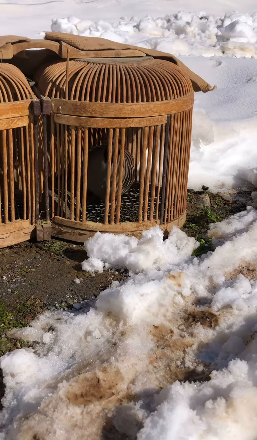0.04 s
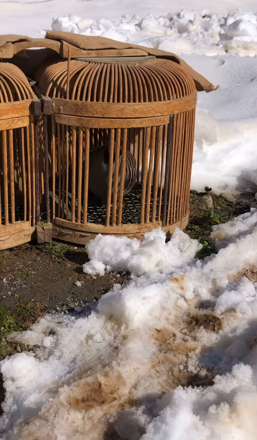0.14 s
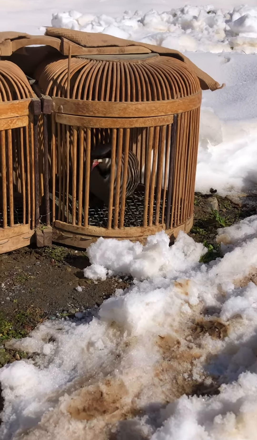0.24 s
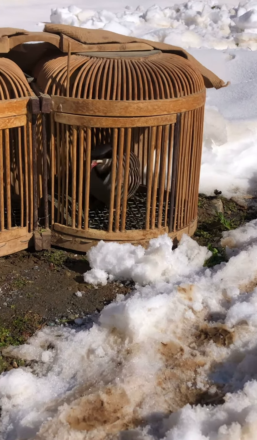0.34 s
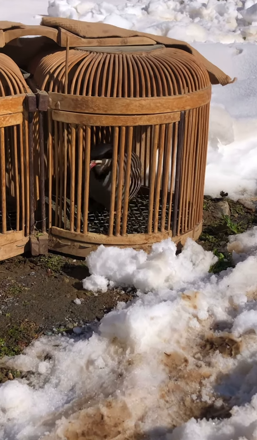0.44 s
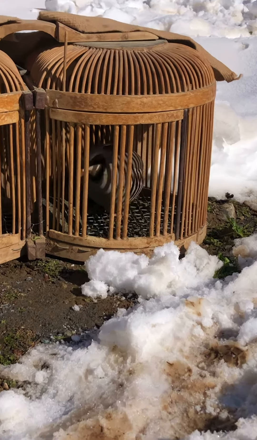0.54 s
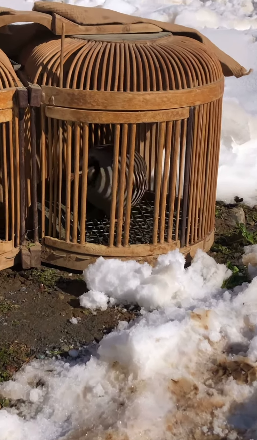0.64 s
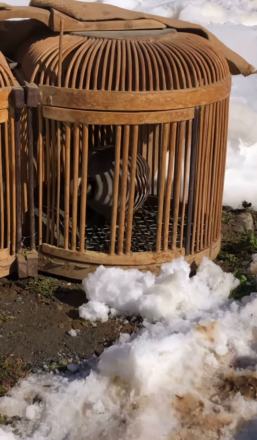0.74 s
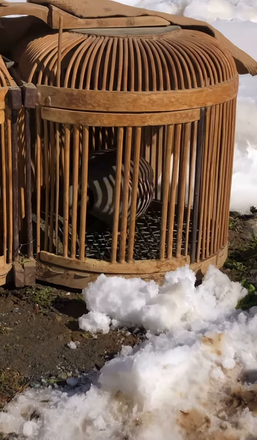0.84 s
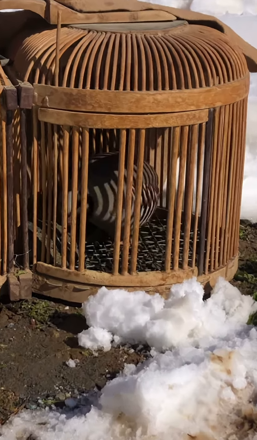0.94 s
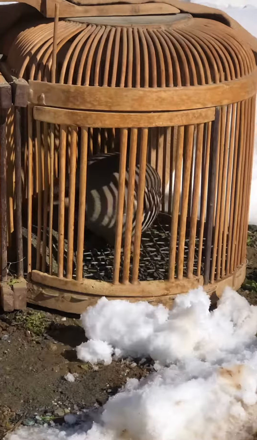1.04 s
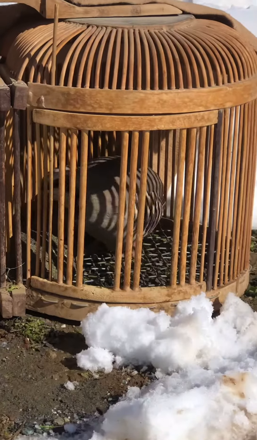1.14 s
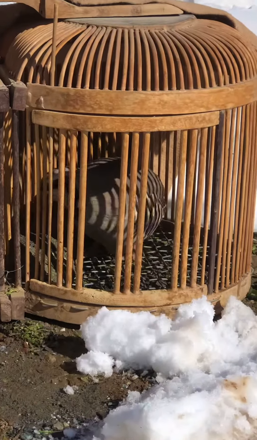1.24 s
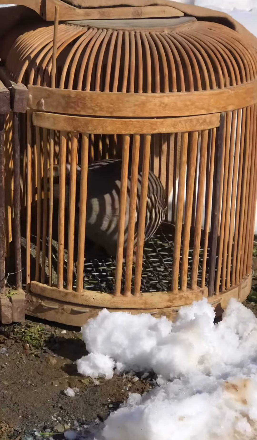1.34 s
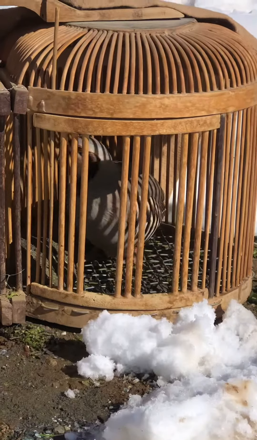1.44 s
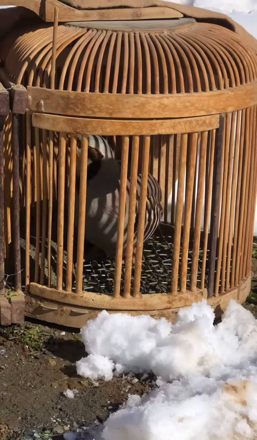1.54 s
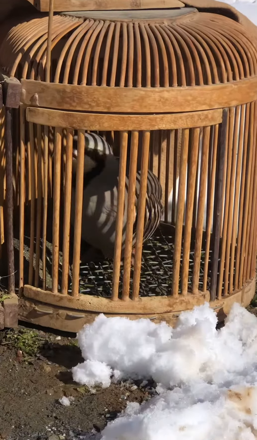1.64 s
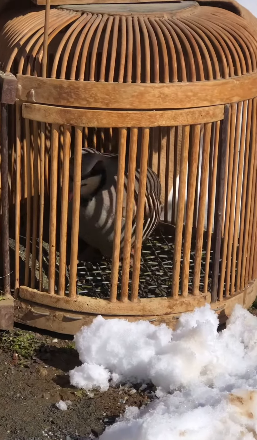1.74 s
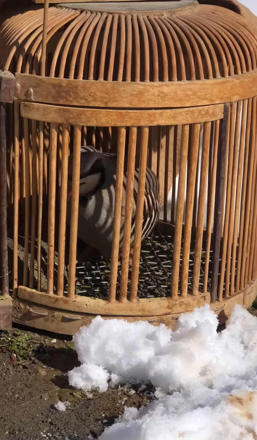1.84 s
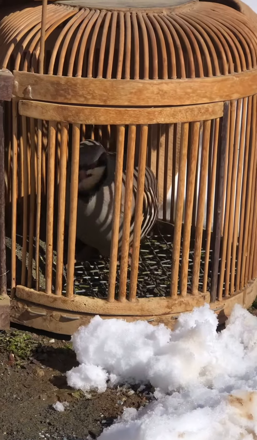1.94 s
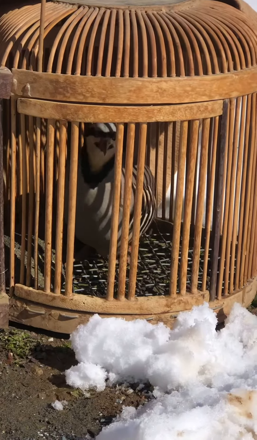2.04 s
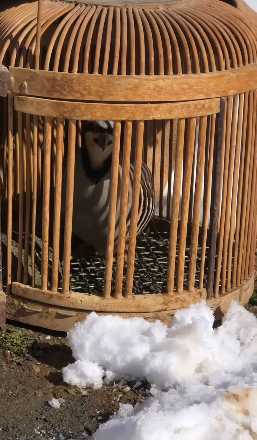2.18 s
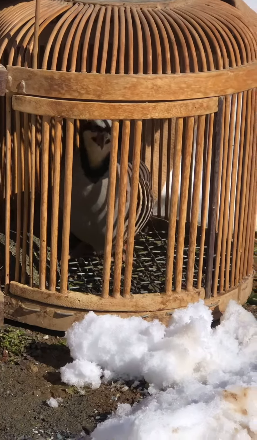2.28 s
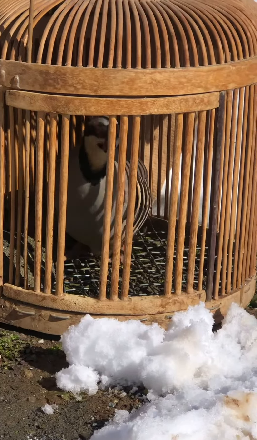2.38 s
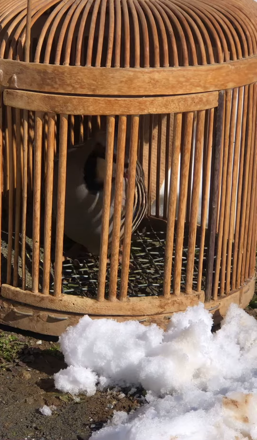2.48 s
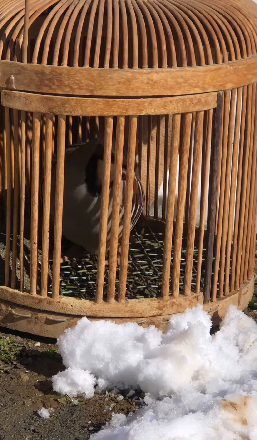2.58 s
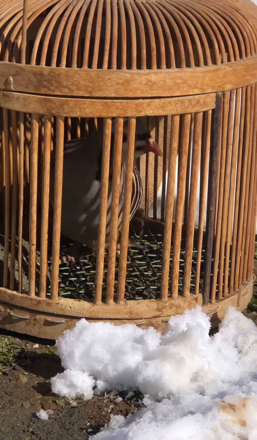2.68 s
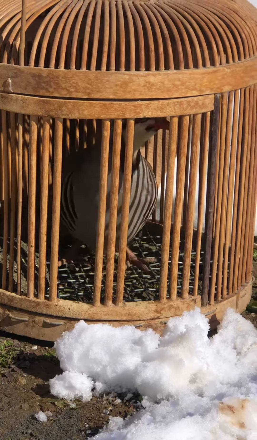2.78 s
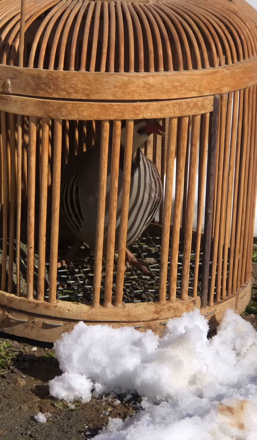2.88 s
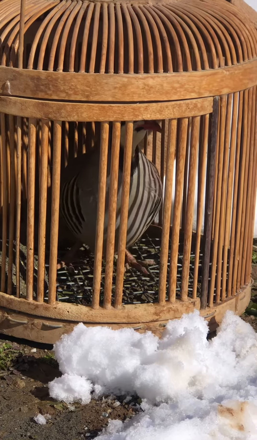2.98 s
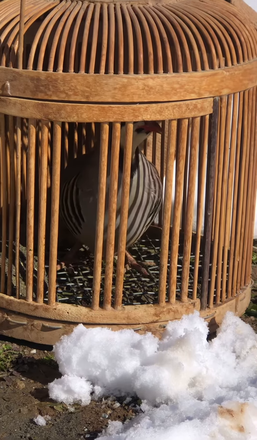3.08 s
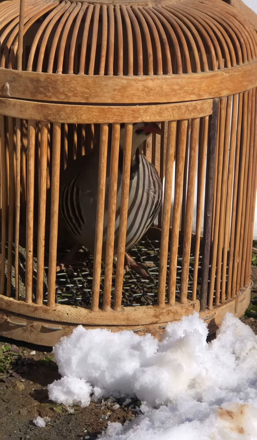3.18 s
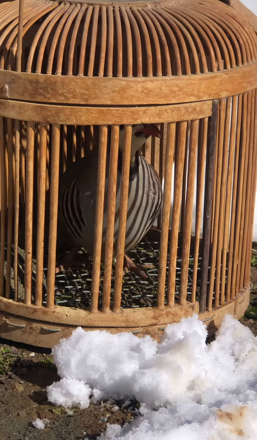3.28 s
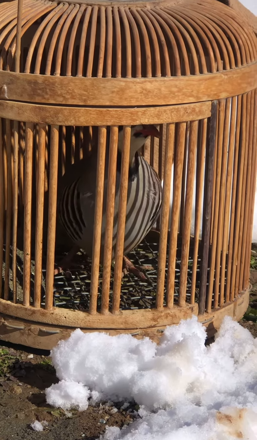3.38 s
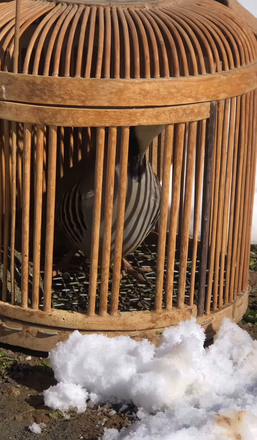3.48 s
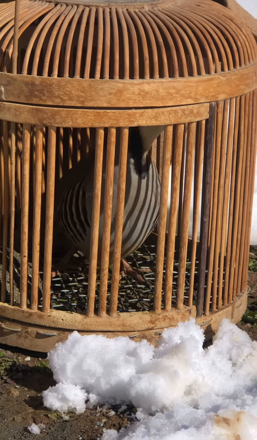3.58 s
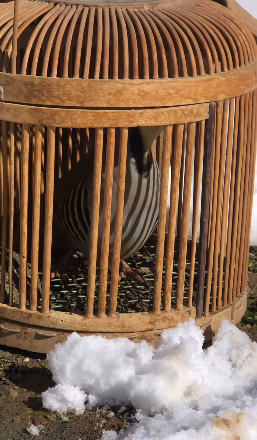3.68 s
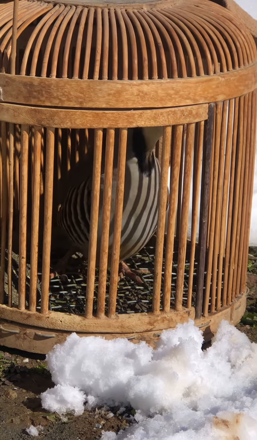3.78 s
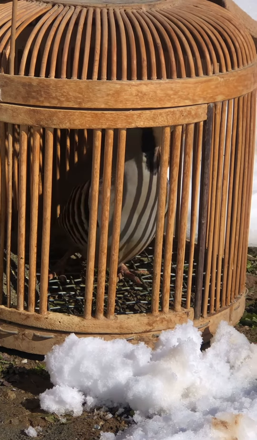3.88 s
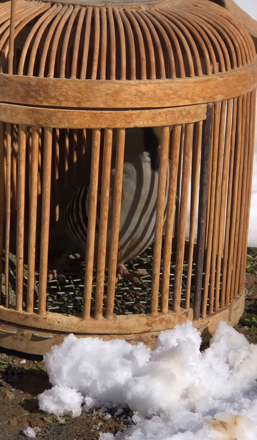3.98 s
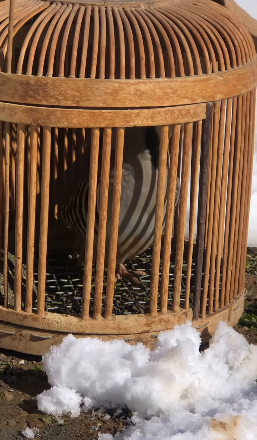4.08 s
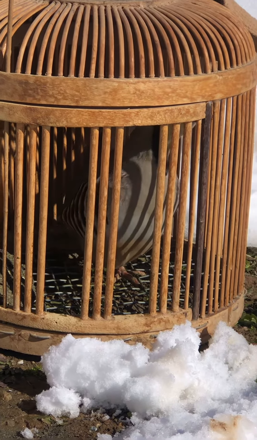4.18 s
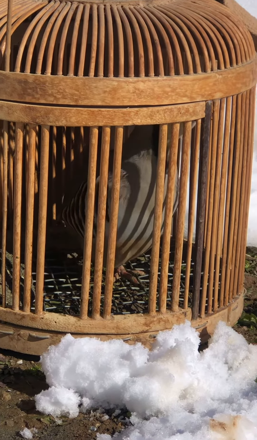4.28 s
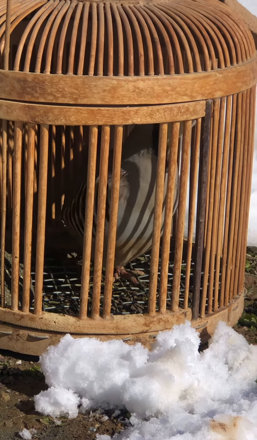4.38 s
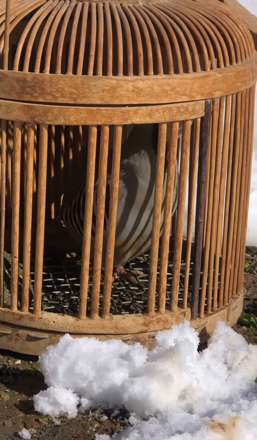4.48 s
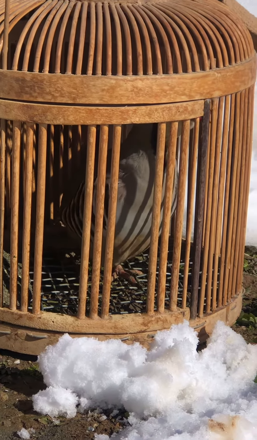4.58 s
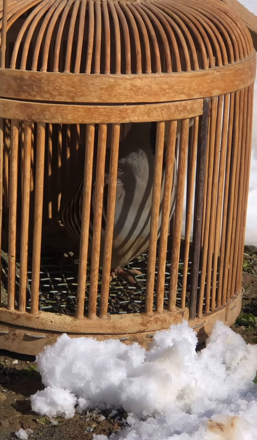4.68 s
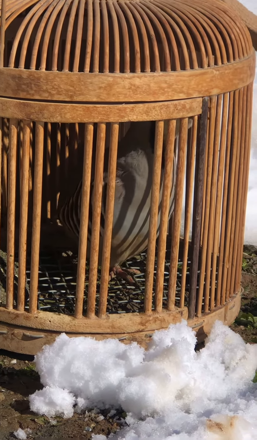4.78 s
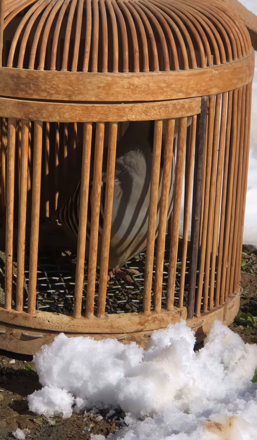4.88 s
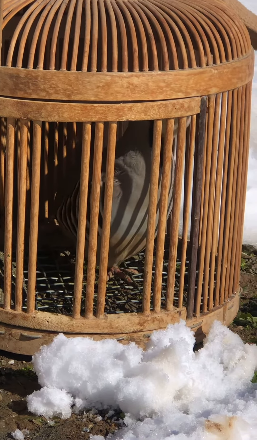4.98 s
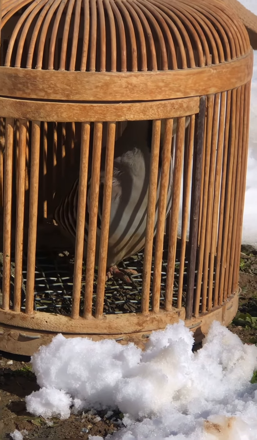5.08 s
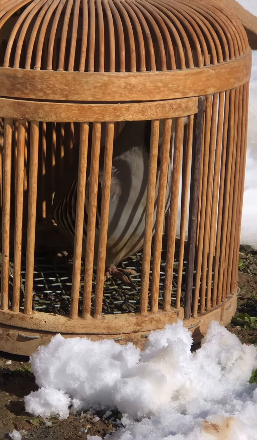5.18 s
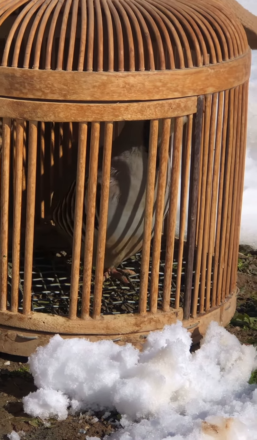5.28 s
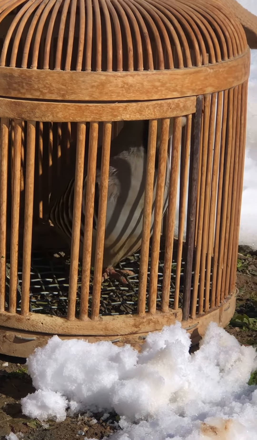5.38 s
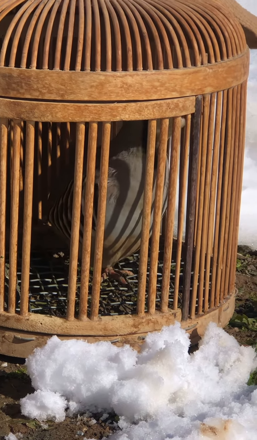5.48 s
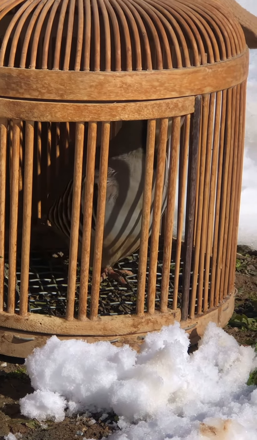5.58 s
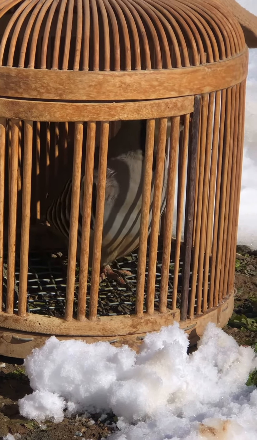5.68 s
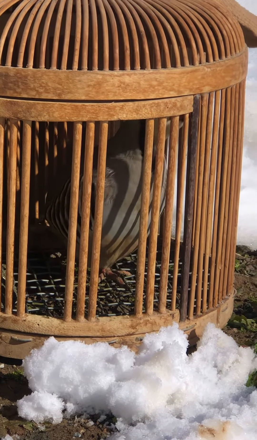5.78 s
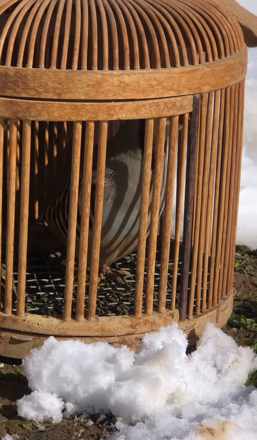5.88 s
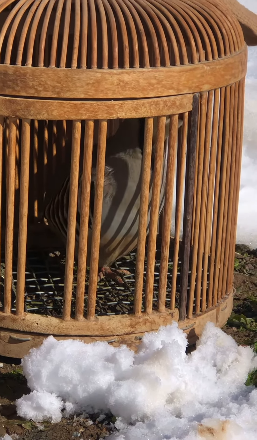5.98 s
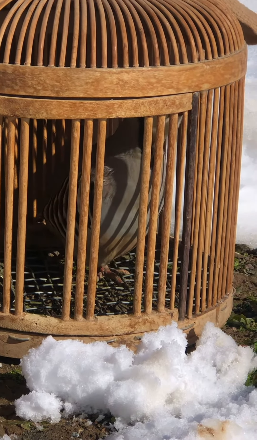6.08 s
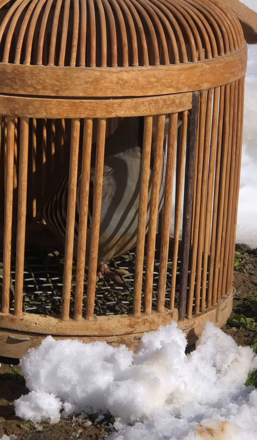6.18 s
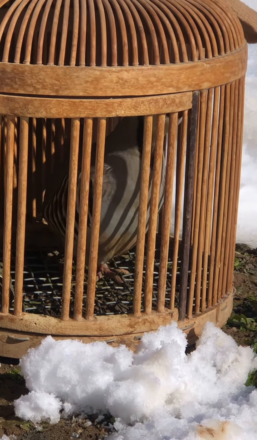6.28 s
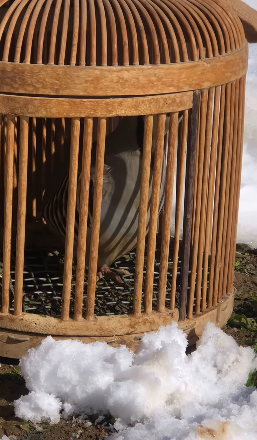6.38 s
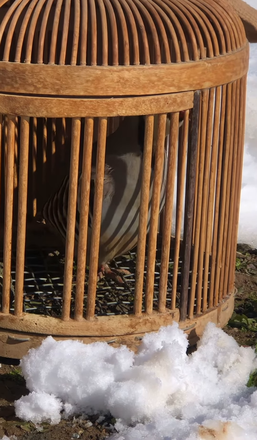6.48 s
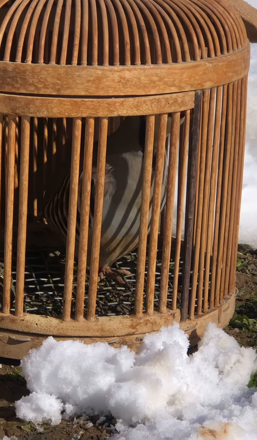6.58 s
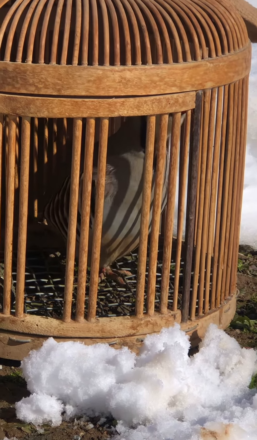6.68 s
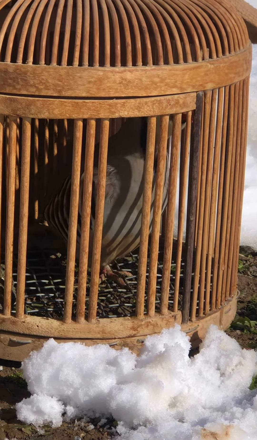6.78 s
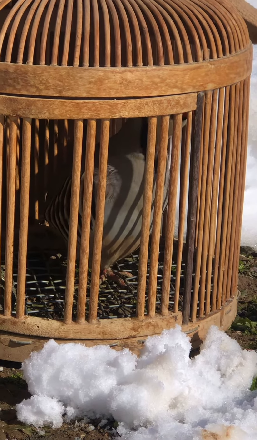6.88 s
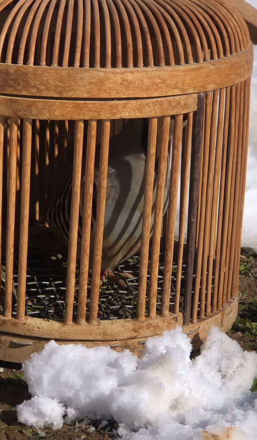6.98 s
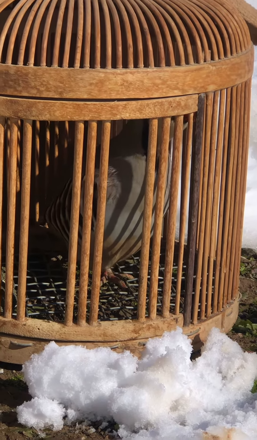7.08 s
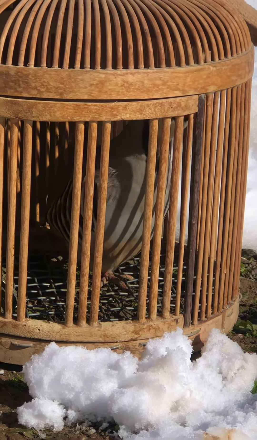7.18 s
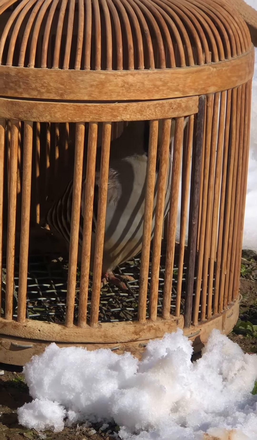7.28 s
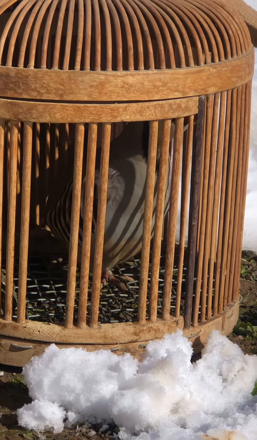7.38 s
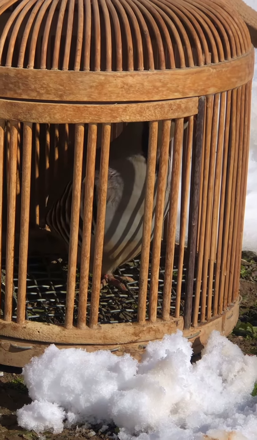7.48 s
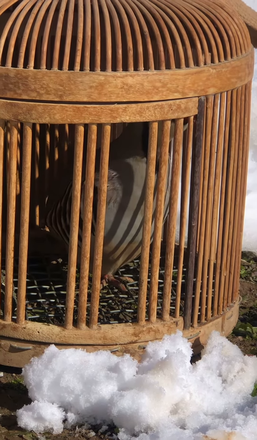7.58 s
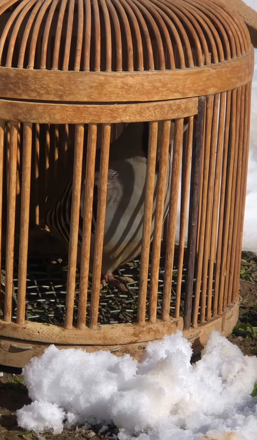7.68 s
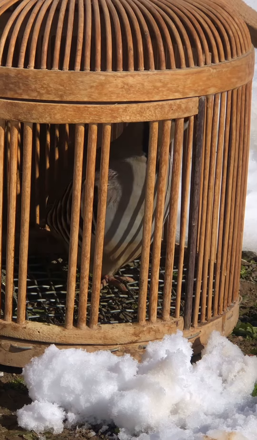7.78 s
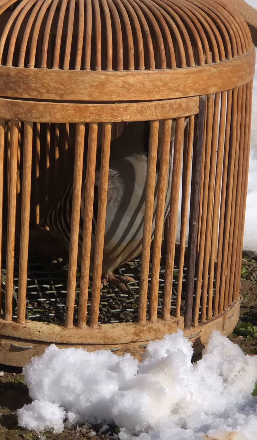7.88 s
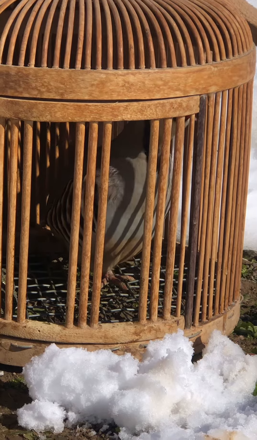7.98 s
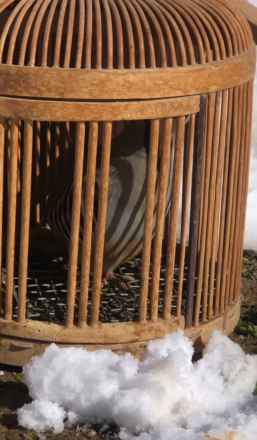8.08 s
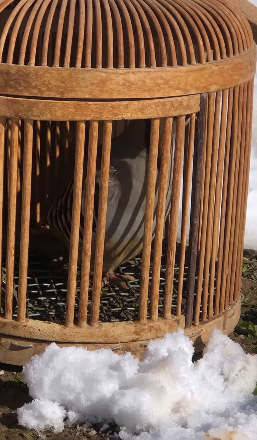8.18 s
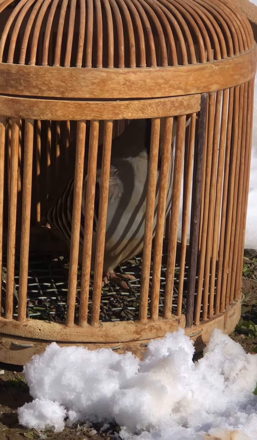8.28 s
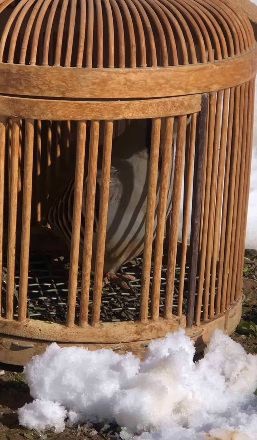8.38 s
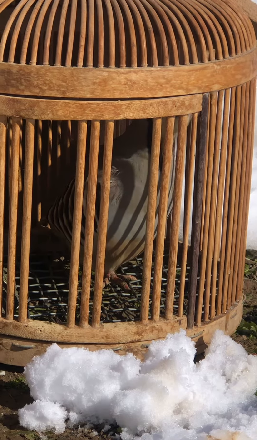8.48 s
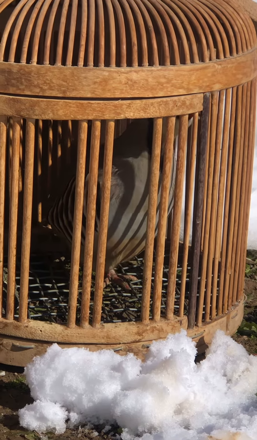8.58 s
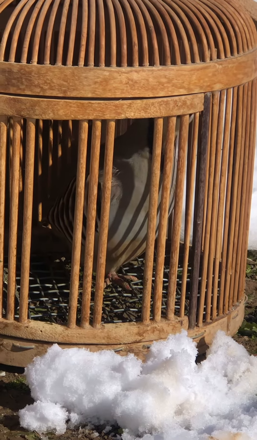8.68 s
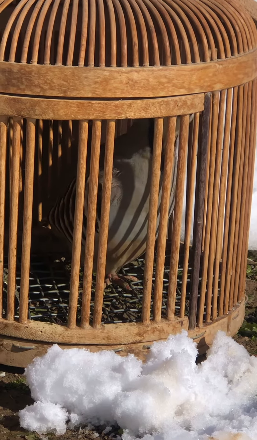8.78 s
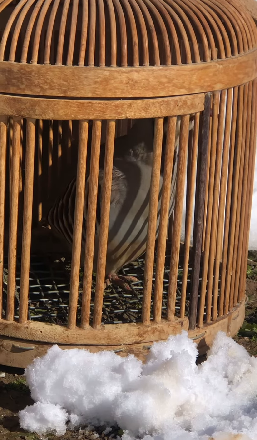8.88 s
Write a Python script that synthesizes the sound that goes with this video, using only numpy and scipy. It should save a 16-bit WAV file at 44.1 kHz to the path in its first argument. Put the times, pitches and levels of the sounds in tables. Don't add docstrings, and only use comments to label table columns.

```python
import sys
import numpy as np
from scipy import signal
from scipy.io import wavfile
from scipy.ndimage import uniform_filter1d

SR = 44100
rng = np.random.default_rng(int(sys.argv[2]) if len(sys.argv) > 2 else 0)


def volts(x):
    e = np.asarray(x, float) / 20
    return 10 ** e


def dump_mix(stems):
    frames = np.atleast_2d(stems).T
    limited = np.clip(frames, -1, 1)
    pcm = np.round(limited * 32767).astype(np.int16)
    wavfile.write(sys.argv[1], SR, pcm)


N = 394243

# frequency_hz, density_db
AIR_SPECTRUM = [(15, -57.5), (25, -21), (60, 0), (108, -14.5), (138, -10.5), (167, -11.5), (378, -13.5),
                (3600, -22), (14800, -35.5), (16500, -36)]
AIR_DB = -53.5
# time_s, level_db
WIND_PUFFS = [(0.0, -82.5), (0.22, -78), (0.45, -50.5), (0.69, -65.5), (0.79, -54.5), (1.19, -72),
              (8.89, -88), (8.94, -81)]
# time_s, pitch_hz, level_db
CHIRP = [
    (5.17, 9150, -71.5),
    (5.202, 8150, -73.5),
    (5.225, 6500, -62),
]
# start_s, level_db, length_s
FAR_BIRD = [
    (8.268, -50, 0.0364),
    (8.451, -44.5, 0.039),
    (8.621, -48, 0.0713),
    (8.664, -48.5, 0.0435),
    (8.833, -44.5, 0.0443),
]
# start_s, peak_db, centre_hz
FAINT_TICKS = [(0.2581, -45.5, 13300), (0.2994, -50.5, 5240), (0.3492, -52, 5260), (0.3975, -59.5, 5720),
               (0.555, -67.5, 6910), (1.1024, -66, 6920), (1.1897, -61.5, 7190), (1.5417, -48, 5910),
               (2.2385, -43.5, 10800), (2.8346, -53, 11600), (2.8668, -45, 5030), (3.3891, -44.5, 5090),
               (4.6493, -64.5, 6350), (5.0139, -50, 5660), (5.1454, -44.5, 11100), (5.1693, -51.5, 8780),
               (5.76, -42.5, 10400), (6.3068, -49.5, 9080), (6.3943, -52, 5910), (6.9012, -61.5, 6300),
               (6.9495, -51.5, 5010), (7.4943, -48, 6480), (8.31, -47, 5190), (8.6999, -49, 8560)]
# start_s, peak_db
THUDS = [(0.501, -36.5), (0.543, -38), (0.732, -45), (0.782, -47.5), (2.855, -43), (3.793, -44.5),
         (4.333, -41.5), (5.169, -42), (5.759, -43), (6.956, -42.5), (8.04, -43), (8.072, -44.5)]
# start_s, peak_db, centre_hz
TICKS = [(0.2178, -23.5, 11970), (0.71, -44.5, 7000), (0.7532, -37.5, 6050), (0.861, -45.5, 5500),
         (0.8152, -25.5, 3820), (0.9146, -40.5, 5880), (1.426, -33, 4593), (1.522, -41, 4140),
         (1.7642, -37, 3200), (1.9102, -37, 5640), (2.047, -27, 14340), (2.639, -27.5, 6180),
         (2.8434, -39.5, 11760), (3.295, -36, 4000), (3.3357, -37.5, 4520), (3.821, -32.5, 4700),
         (3.931, -30.5, 13300), (4.4371, -29.5, 4230), (4.9909, -35, 5140), (5.0464, -28, 3690),
         (5.9358, -30, 8330), (6.263, -25, 5800), (6.3685, -33, 12300), (6.8593, -30, 5290),
         (7.1563, -34, 4209), (7.451, -32, 8460), (8.07, -31.5, 5980), (8.6669, -25, 5256),
         (8.7607, -36, 4641)]

# start_s, length_s, held_pitch_hz, level_db, half_pitch_line_db, roughness_0_to_1
CLUCKS = [
    (0.276, 0.0349, 1009, -42.5, -11, 0.17),
    (1.123, 0.0364, 891.8, -45, -7.5, 0.27),
    (1.425, 0.03904, 943, -47, -7, 0.77),
    (1.761, 0.0422, 950, -46, -6.5, 0.83),
]

# time_s, throat_hz, beak_hz, chest_tone_db, gap_fill_db, air_db, roughness_0_to_1
POSTURE = [(1.9, 900, 5540, -40.5, 12, -9.5, 1.03), (2.1, 1330, 5614, -43, 18, -8.5, 0.59),
           (2.7, 1267, 4764, -41, 11.5, -16.5, 0.79), (3.6, 1278, 4375, -39.5, 3.5, -17.5, 1.45),
           (4.5, 1283, 3873, -38, 6, -14, 0.89), (5.3, 1254, 3569, -37, 3, -14.5, 1.13),
           (6.199, 1268, 3455, -36.5, 4, -13.5, 1.15), (8.7, 1239, 3464, -37, 5.5, -11.5, 0.72)]
# time_s, level_db
BEAK_OPENING = [(1.9, -58), (2.15, -58.5), (2.55, -56), (2.75, -47.5), (3.6, -37), (4.5, -35), (5.3, -29.5),
                (6.2, -29.5), (8.7, -29.5)]
# pitch_hz, gain_db
CHEST_RESPONSE = [(240, 13), (315, -0.5), (400, 3.5), (470, 10), (540, 5), (700, 0.5), (900, 12.5)]
# factor_on_beak_hz, width_hz, gain_db
BEAK_MODES = [(0.838, 600, -4.5), (0.953, 385, 9.5), (1.05, 322, 6.5), (1.17, 418, -18.5)]
# centre_hz, width_hz, gain_db
GAP_MODES = [(900, 391, 6), (1676, 860, 11.5)]
# factor_on_beak_hz, width_hz, gain_db
UNDER_BEAK = (0.7193, 478, 6.14)
# factor_on_beak_hz, width_hz, gain_db
OVERTONES = [(1.438, 466, 8), (1.632, 480, 5), (2.08, 450, -4.5)]
# centre_hz, width_hz, gain_db
AIRY_MODES = [(7320, 690, 7), (8495, 493, 3), (10290, 1530, 1), (11960, 466, 8), (13090, 660, 1.5),
              (15090, 750, 4)]

# place_0_to_1, pitch (0 slack, 1 the note's pitch, 2 tight),
# effort (0 opening, 1 late), throat_ring_db, beak_ring_db
SLIDE_SHAPE = [(0, .85, 0.55, -26, -39), (.15, .9, 0.137, -5, -5.5), (.4, 1, 0, 2, 2),
               (.7, .32, 1, 5, -1.5), (1, 0.0088, 0.87, -9, -17.5)]
PIP_SHAPE = [(0, 0.69, 0.21, -22.5, -42.5), (.22, 0.82, 0.054, 1, -8.5), (.75, .95, 1, -1.5, 0.5),
             (1, 0.6236, 1, -1.5, -7)]
KA_SHAPE = [(0, 1.213, 0.006, -41, -43.5), (.17, 1, 0.012, -6, -11.5), (.4, .85, 0.167, -4, -2.5),
            (.65, .55, 0.992, 4, -3.5), (.88, .22, 1, -8.5, -10), (1, 0.25, 0.84, -13, -16.5)]
CHUK_SHAPE = [(0, 2, 0, -13, -23), (.07, 1.95, 0.277, -7, -10.5), (.22, 1.75, 0.196, 4, 1),
              (.3, .92, 0.3, -3.5, -2.5), (.54, .95, 0.182, 3.5, -0.5), (.66, 1.02, 0, -14, -2.5),
              (.77, 0.964, 0.705, -2.5, 0), (.88, 0.7853, 0.972, -1.5, -6.5), (1, 0.044, 0.59, -35, -31)]
HALF_KAR_SHAPE = [(0, 1.8, 0, -30.5, -20), (.2, 2.0, 0.3, -9, -6.5), (.4, 1.7, 0.26, -2, 1),
                  (.52, 1, 0.064, 3.5, -1.5), (.66, 1.02, .5, -8.5, 3.5), (.82, .8, 1, 4, 4),
                  (1, 0.118, 0.32, -12, -19.5)]
KAR_SHAPE = [(0, 2, 0.099, -26.5, -33), (.12, 1.6, 0.15, -6.5, -7), (.32, 1.3, 0.192, 2.5, -5),
             (.38, .97, 0, -3, -0.5), (.52, 1, 0.019, 10.5, 1), (.63, 1.04, 0.049, -34, -1),
             (.72, 1.02, 1, -5.5, 1.5), (.88, 0.9489, 1, 2, -0.5), (1, 0.1318, 0, -8.5, -22.5)]

# start_s, length_s, opening_db, late_db, pitch_hz (top or held)
SLIDES = [(1.889, 0.0442, -57.5, -41, 950), (2.13, 0.0696, -34, -36, 804),
          (2.344, 0.0689, -32.5, -40.5, 676.2), (2.524, 0.0902, -33.5, -41.5, 771.2),
          (2.73, 0.0578, -28, -34.5, 724.9), (3.186, .07, -26.5, -31, 737.9),
          (3.684, 0.07665, -22, -30, 690.4), (4.201, 0.06584, -21.5, -28.5, 759.2)]
PIPS = [
    (2.887, 0.0534, -29.5, -31, 748.5),
    (3.344, 0.0542, -33, -37, 787.9),
    (3.857, 0.052, -29, -26, 731.8),
]
KAS = [(4.367, 0.0606, -25, -30, 739.8), (4.909, 0.0611, -25.5, -31, 750), (5.473, 0.06, -23, -30, 728.1),
       (6.041, 0.0601, -25.5, -33, 737.1), (6.61, 0.0587, -24.5, -31.5, 723.6),
       (7.184, 0.054, -27, -35, 717.1), (7.774, 0.0585, -25, -34, 711.8),
       (8.386, 0.0595, -25.5, -30.5, 701.6)]
CHUKS = [(4.724, 0.0833, -23, -26, 387.2), (5.272, 0.091, -25.5, -19.5, 440.6),
         (5.84, 0.08696, -27.5, -17.5, 455.2), (6.408, 0.08954, -28, -20, 434.6),
         (6.982, .09, -26.5, -18, 447.9), (7.563, 0.09644, -28, -15, 456.3),
         (8.158, 0.1041, -30, -12.5, 470.3)]
HALF_KARS = [
    (2.993, 0.0737, -28.5, -31, 419.5),
    (3.466, 0.1018, -25.5, -30.5, 413.8),
    (3.972, 0.106, -25, -26.5, 435.2),
    (4.481, 0.1046, -27, -26, 448),
]
KARS = [(5.026, .11, -34, -18, 448.5), (5.591, 0.1081, -38, -18.5, 459), (6.159, 0.11247, -37, -18, 465.6),
        (6.729, 0.1079, -31.5, -18.5, 454.1), (7.3, 0.12, -35.5, -17.5, 457.4),
        (7.891, 0.12197, -37, -17, 457.2), (8.509, 0.10654, -34, -17.5, 444.3)]

RASP = [
    .12,
    .14,
    .2,
    .28,
    .15,
    .12,
]
SCOOP = [
    .2,
    0.1934,
    0.054,
    0.03145,
    .3,
    0.0149,
]
SQUEAK_TONES = [3, -4, -18.5, -24, -22, -25, -35]

SLACK_HZ, TIGHT_HZ = 269.2, 750
STRAIN_DB = 3.5
OCTAVE_DB = -9
SQUEAK_HZ, SQUEAK_S, SQUEAK_DB = 1501.3, 0.01856, -37.5


def evened(x):
    return x / np.sqrt(np.mean(x ** 2) + 1e-20)


def levelled(x, size=600):
    power = uniform_filter1d(uniform_filter1d(x ** 2, size), size)
    return x / np.sqrt(power + 1e-12)


def wobble(n, hz):
    noise = rng.standard_normal(n + 400)
    return evened(signal.lfilter(*signal.butter(2, 2 * hz / SR), noise)[400:])


def add(mix, s, sound):
    part = mix[round(s * SR):][:len(sound)]
    part += sound[:len(part)]


def resonate(x, hz, width):
    turn = np.exp(2j * np.pi * np.cumsum(hz * np.ones(len(x))) / SR)
    r = np.exp(-np.pi * width / SR)
    return 2 * (turn * signal.lfilter([1 - r], [1, -r], x / turn)).real


def tract(x, modes, shift=1, patchy_db=1.0, order=2):
    out = np.zeros(len(x))
    for k, (hz, width, db) in enumerate(modes):
        steep = x
        for _ in range(order):
            steep = resonate(steep, hz * shift, width)
        out += (-1) ** k * volts(db + patchy_db * wobble(len(x), 30)) * steep
    return levelled(out)


def syrinx(hz, rough):
    n = len(hz)
    flutter = np.sin(2 * np.pi * np.cumsum(.3 * hz * (1 + .14 * wobble(n, 60))) / SR)
    shake = .012 * wobble(n, 60) + rough * (.15 * flutter + .025 * wobble(n, 300))
    turns = np.cumsum(hz * (1 + shake)) / SR
    k = np.arange(1, 40)[:, None]
    harmonics = np.cos(2 * np.pi * k * turns) * (k * hz < .4 * SR)
    pulses = evened(harmonics.sum(0))
    puffs = (0.18 + np.exp(-(turns % 1) / 0.45)) * rng.standard_normal(n)
    leak = .07 + .16 * rough
    return turns, (1 + 0.442 * rough * flutter) * (1 - leak) * pulses + leak * evened(puffs)


def hush():
    frames = N // 256 + 5
    hz = np.fft.rfftfreq(1024, 1 / SR)
    a, b, patches = rng.standard_normal((frames, 513, 3)).T
    patches = evened(uniform_filter1d(uniform_filter1d(patches, 12, 0), 10, 1))
    f, db = np.transpose(AIR_SPECTRUM)
    shape = np.interp(np.log(hz + 1), np.log(f + 1), db)[:, None]
    bins = (a + 1j * b) * volts(shape + 0.77 * patches)
    air = evened(signal.istft(bins, nperseg=1024, noverlap=768)[1][:N])
    low = signal.butter(2, [2 * 45 / SR, 2 * 110 / SR], "band")
    wind = evened(signal.lfilter(*low, rng.standard_normal(N)))
    wind_db = np.interp(np.arange(N) / SR, *np.transpose(WIND_PUFFS)) - 11.5
    return volts(AIR_DB - 12.5) * air + volts(wind_db) * wind


def echo(x, t60, delay):
    taps = np.zeros(SR)
    at = np.arange(round(delay * SR), SR - 20, 20)
    decay = volts(-60 * at / SR / t60)
    taps[at + rng.integers(0, 20, len(at))] = rng.choice([-1., 1.], len(at)) * decay
    taps = signal.lfilter(*signal.butter(1, 2 * 4500 / SR), taps)
    return signal.fftconvolve(x, taps / np.linalg.norm(taps))[:N]


def chirp():
    s, hz, db = np.transpose(CHIRP)
    t = np.arange(s[0], s[-1], 1 / SR)
    turns = np.cumsum(np.interp(t, s, hz)) / SR
    return s[0], volts(np.interp(t, s, db)) * np.sin(2 * np.pi * turns)


def twitter():
    modes = [(2990, 720, -1), (4100, 400, -3), (5580, 500, 2.0)]
    scratch = tract(rng.standard_normal(2200), modes, patchy_db=5)
    return volts(-59.5) * scratch * np.hanning(2200) ** .5


def far_note(db, length):
    n = round(length * SR)
    drive = syrinx(np.linspace(900, 720, n), 1.0)[1]
    ring = tract(drive, [(1606, 378.4, 0)])
    ring = ring + volts(-19.5) * tract(drive, [(950, 230, 8.5), (3316, 495, -15.0)])
    return volts(db) * ring * np.sin(np.pi * np.linspace(0, 1, n) ** .5)


def thud(db):
    t = np.arange(1500) / SR
    burst = rng.standard_normal(len(t)) * volts(-60 * t / .045) * np.minimum(t / .003, 1)
    burst[:40] += 2 * np.hanning(40)
    frame = signal.butter(3, [2 * 180 / SR, 2 * 2300 / SR], "band")
    knock = signal.lfilter(*frame, burst)
    return volts(db) * knock / abs(knock).max()


def tick(db, hz):
    t = np.arange(1800) / SR
    decay = volts(-60 * t / 0.00553) + volts(-18.0 - 60 * t / 0.0465)
    burst = rng.standard_normal(len(t)) * decay * np.minimum(t / 0.000309, 1)
    snap = resonate(burst, hz, 1900) + 0.48 * burst
    snap = signal.lfilter(*signal.butter(2, 2 * 2400 / SR, "high"), snap)
    return volts(db) * snap / abs(snap).max()


def cluck(length, held_hz, db, half_db, rough, opening=.52):
    t = np.arange(0, length, 1 / SR)
    scoop = np.clip(t / 0.013295, 0, 1)
    bend = opening + (1 - opening) * scoop ** 1.36 - 0.0733 * (t / length) ** 2
    turns = np.cumsum(held_hz * (bend + 0.0498 * rough * wobble(len(t), 284))) / SR
    tones_db = [3.5, -21, -24.0, -36.5]
    whole = sum(volts(level) * np.cos(2 * np.pi * (k + 1) * turns) for k, level in enumerate(tones_db))
    half = sum(volts(-4 * k) * np.cos(2 * np.pi * (k + .5) * turns) for k in range(4))
    throb = 1 + rough * wobble(len(t), 205.0)
    modes = [(1076, 766, 16.5), (3000, 750, -18), (5500, 2140, -3)]
    breath = 0.804 * rough * tract(rng.standard_normal(len(t)), modes)
    voice = whole + volts(half_db) * scoop ** 3 * throb * half + breath
    return volts(db + 5.5 - 1.98 * (2.5 - scoop)) * voice * signal.windows.tukey(len(t), .3)


def squeak(effort_db):
    t = np.arange(0, SQUEAK_S, 1 / SR)
    hz = SQUEAK_HZ * (.995 + 0.015 * t / SQUEAK_S + .004 * wobble(len(t), 80))
    turns = np.cumsum(hz) / SR
    tone = sum(volts(db) * np.cos(2 * np.pi * (k + 1) * turns) for k, db in enumerate(SQUEAK_TONES))
    return volts(SQUEAK_DB + effort_db) * tone * np.sin(np.pi * (t / SQUEAK_S) ** 1.87)


def shaped(shape, start, length, opening_db, late_db, hz):
    place, pitch, effort, throat_db, beak_db = np.transpose(shape)
    s = start + length * np.maximum.accumulate(place)
    pitch_hz = np.interp(pitch, [0, 1, 2], [SLACK_HZ, hz, TIGHT_HZ])
    throat_db = throat_db + opening_db + effort * (late_db - opening_db)
    beak_db = beak_db + np.interp(start, *np.transpose(BEAK_OPENING))
    return np.transpose([s, pitch_hz, throat_db, beak_db])


def note(rows, rasp, scoop):
    s, pitch_hz, throat_db, ring_db = np.transpose(rows)
    t = np.arange(s[0] - .002, s[-1] + 0.00873, 1 / SR)
    beak_db = np.interp(t, s, ring_db)
    when, *posture = np.transpose(POSTURE)
    throat_hz, beak_hz, chest_db, gap_db, air_db, harsh = (np.interp(s[0], when, c) for c in posture)

    after = np.maximum(t - s[-1], 0)
    hz = np.interp(t, s, pitch_hz) * (1 - 9 * after)
    hz = hz * (1 - scoop * np.exp(-(t - t[0]) / 0.009))
    tight = np.clip((hz - 470) / 90, rasp, 1)
    onset = np.clip((t - s[0]) / (0.00618 + 0.05 * scoop), .1, 1) ** 0.974
    rough = np.clip(harsh * tight * onset, 0, 1)
    turns, drive = syrinx(hz, rough)
    swell = np.clip((t - s[0]) / 0.0104, 0, 1)

    spent_db = .5 * np.minimum(beak_db - beak_db.max() + 23.0, 0)
    strain_db = STRAIN_DB * (tight - rasp) * np.clip((beak_db.max() + 31.5) / 18, 0, 1)
    body_db = np.interp(hz, *np.transpose(CHEST_RESPONSE))
    chest = volts(chest_db - 4 + spent_db + strain_db + body_db) * swell
    chest = chest * (1 - 0.367 * rough * (1 + np.tanh(wobble(len(t), 103.3))))
    octave = volts(OCTAVE_DB) * (1 - tight) * np.cos(4 * np.pi * turns)
    chest = chest * (np.cos(2 * np.pi * turns) + octave)

    ring = np.interp(t, s, volts(throat_db / 2)) ** 2
    throat_modes = [(.92, 377, 4.58), (1.15, 409.8, 2.26)]
    throat_shift = throat_hz * (hz / 450) ** 0.1978
    throat = volts(-0.5) * ring * tract(drive, throat_modes, throat_shift, patchy_db=5.5, order=3)

    top = tract(drive, OVERTONES, beak_hz, patchy_db=7)
    top = top + volts(-6.5) * tract(drive, AIRY_MODES, rng.uniform(0.927, 1.03), patchy_db=4.5)
    split = (3500 / beak_hz) ** 1.6
    beak_modes = [(f ** split, width / split ** 0.89, db) for f, width, db in BEAK_MODES]
    upper = tract(drive, beak_modes, beak_hz, patchy_db=9)
    upper = upper + volts(air_db + 0.0004 * (hz - 444.5)) * top

    gap_modes = GAP_MODES + [(UNDER_BEAK[0] * beak_hz, *UNDER_BEAK[1:])]
    gap_level = volts(gap_db + 0.807 * beak_db + 0.628 * chest_db + 5.5)
    gaps = gap_level * swell * tract(drive, gap_modes, patchy_db=6.5)

    edges = np.minimum((t - t[0]) / 0.0034, 1) * np.minimum((t[-1] - t) / 0.01056, 1)
    rings = throat + volts(beak_db) * upper + gaps
    return t[0], (volts(-1400 * after) * chest + volts(-2200 * after) * rings) * edges


def scene():
    near = np.zeros(N)
    add(near, *chirp())
    add(near, 5.222, twitter())
    for s, db, length in FAR_BIRD:
        add(near, s, far_note(db + 2.0, length))
    for s, db, hz in FAINT_TICKS:
        add(near, s, tick(db + 1, hz))
    for s, db in THUDS:
        add(near, s, thud(db))
    for s, db, hz in TICKS:
        add(near, s, tick(db, hz))

    for s, *settings in CLUCKS:
        add(near, s, cluck(*settings))
    add(near, 1.856, cluck(0.0309, 870, -45.5, -8, 0.35, opening=1.7))
    for s, _, opening_db, *_ in KARS[1:]:
        add(near, s - .005, squeak(.5 * (opening_db + 38)))
    kinds = [(SLIDE_SHAPE, SLIDES), (PIP_SHAPE, PIPS), (KA_SHAPE, KAS),
             (CHUK_SHAPE, CHUKS), (HALF_KAR_SHAPE, HALF_KARS), (KAR_SHAPE, KARS)]
    for (shape, notes), rasp, scoop in zip(kinds, RASP, SCOOP):
        for row in notes:
            add(near, *note(shaped(shape, *row), rasp, scoop))

    cage = volts(-15.0) * echo(near, 0.0512, 0.002028)
    bright = signal.lfilter(*signal.butter(1, 2 * 700 / SR, "high"), near)
    slope = volts(-39.0) * echo(bright, 0.764, 0.056)
    return (near + cage + slope + hush())[None]


def band_limit(x):
    return signal.sosfilt(signal.butter(12, 16820, fs=SR, output="sos"), x)


def record(dry):
    bass_cut = signal.lfilter(*signal.butter(3, 2 * 42 / SR, "high"), dry)
    rounded = .45 * np.tanh(bass_cut / .45)
    edge = signal.firwin(301, 15800, window=("kaiser", 7), fs=SR)
    mix = signal.oaconvolve(rounded, edge[None], "same")
    return band_limit(mix)


dry = scene()
out = record(dry)
dump_mix(out)
```